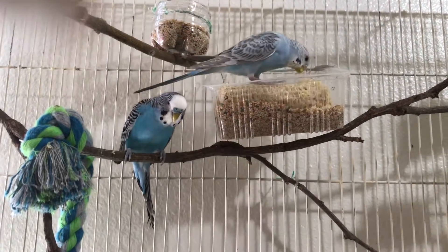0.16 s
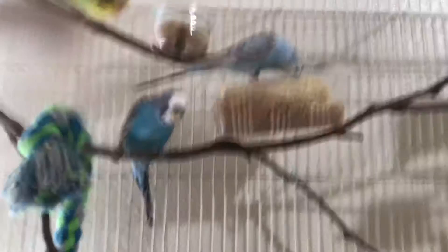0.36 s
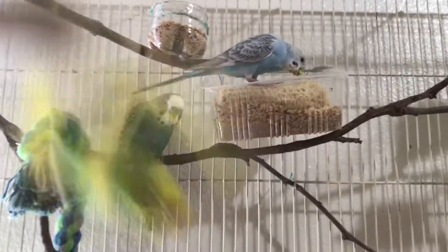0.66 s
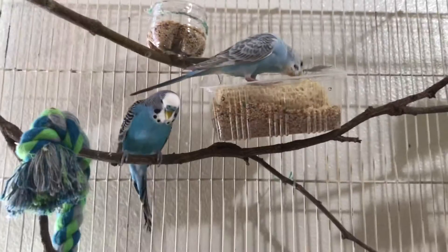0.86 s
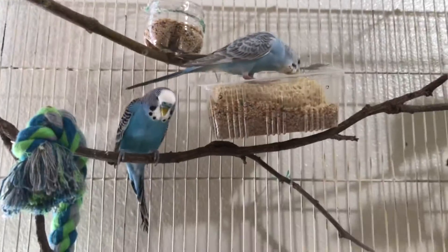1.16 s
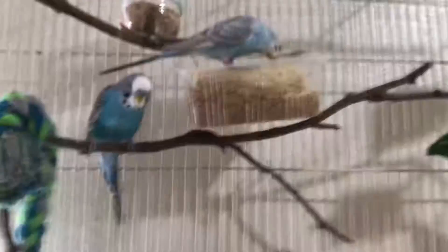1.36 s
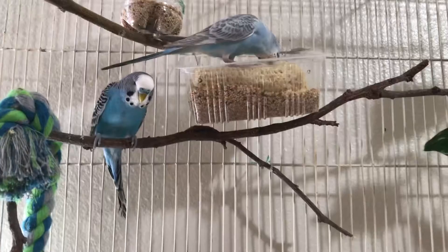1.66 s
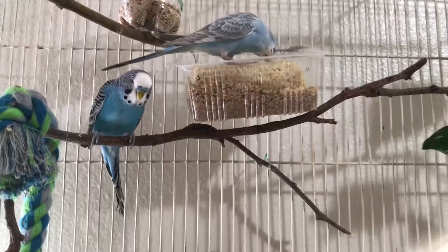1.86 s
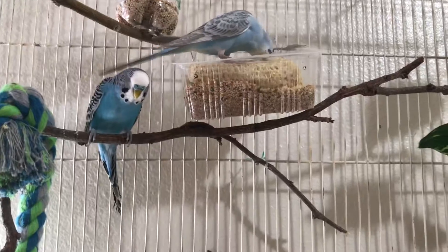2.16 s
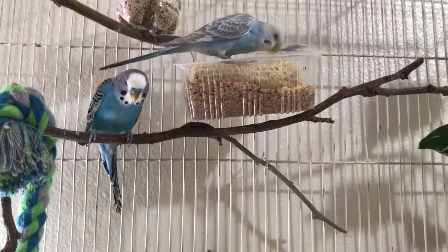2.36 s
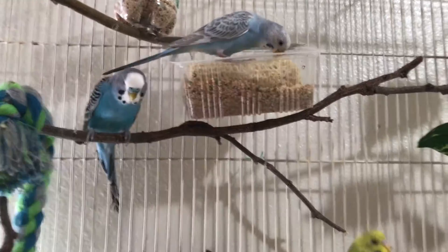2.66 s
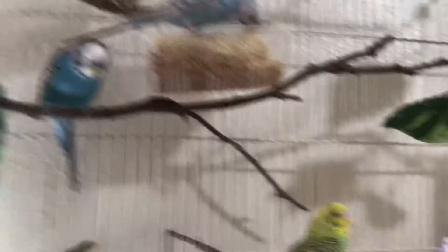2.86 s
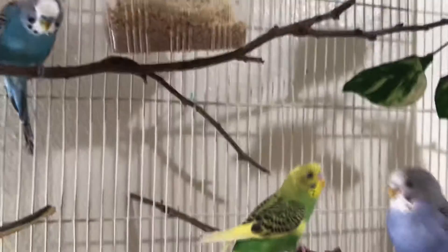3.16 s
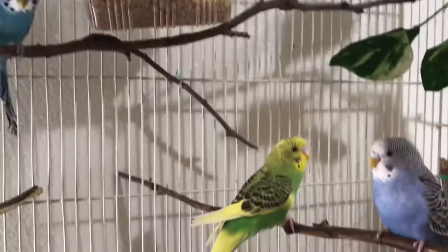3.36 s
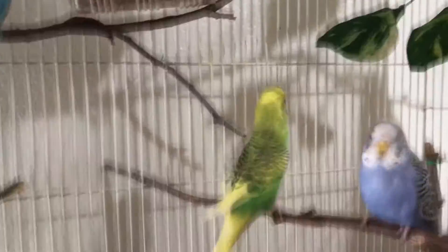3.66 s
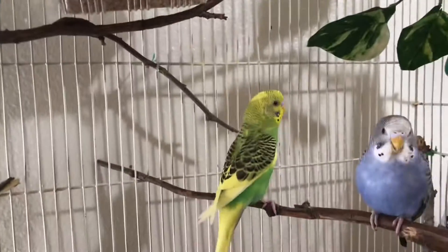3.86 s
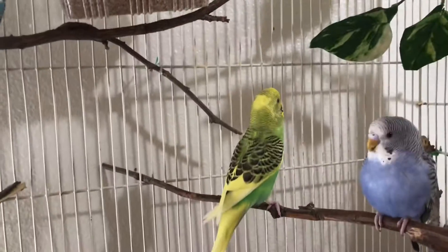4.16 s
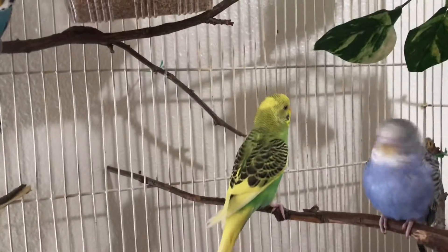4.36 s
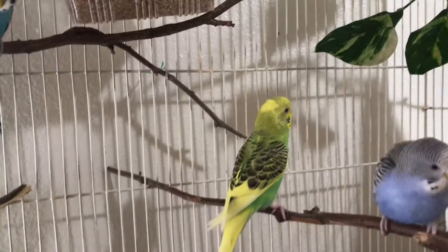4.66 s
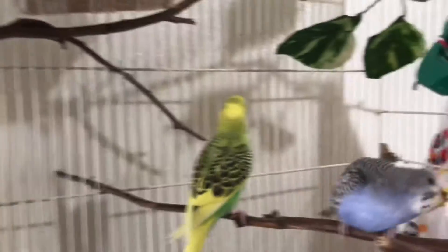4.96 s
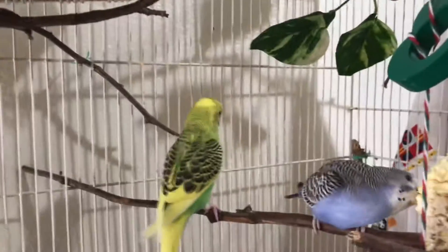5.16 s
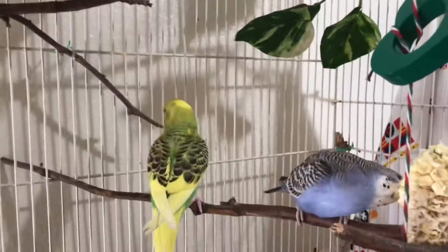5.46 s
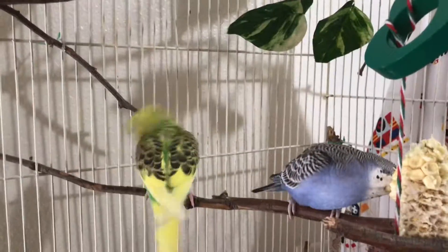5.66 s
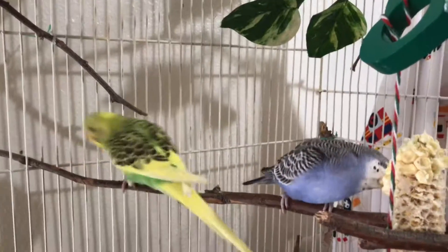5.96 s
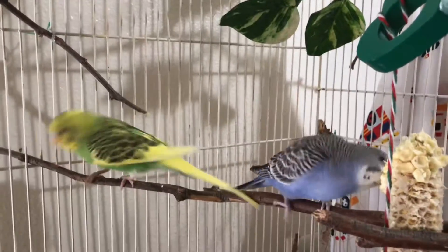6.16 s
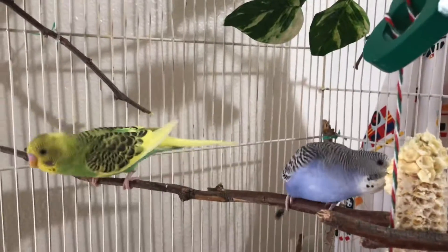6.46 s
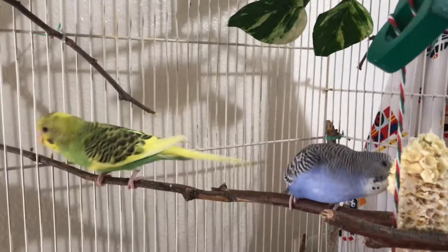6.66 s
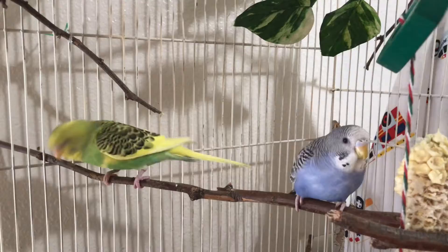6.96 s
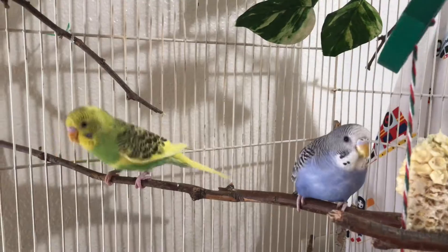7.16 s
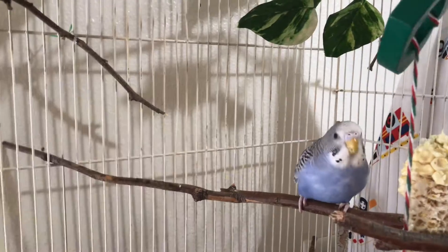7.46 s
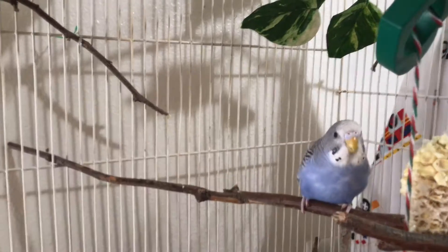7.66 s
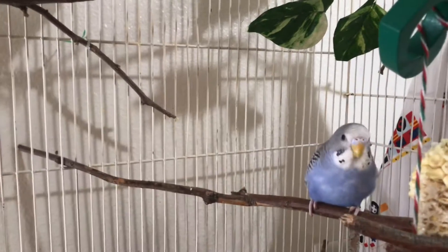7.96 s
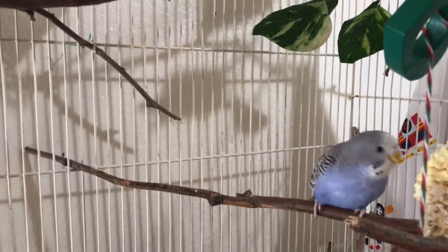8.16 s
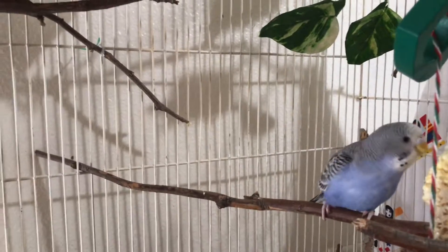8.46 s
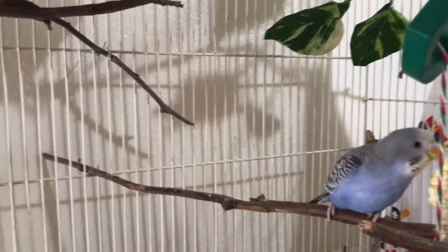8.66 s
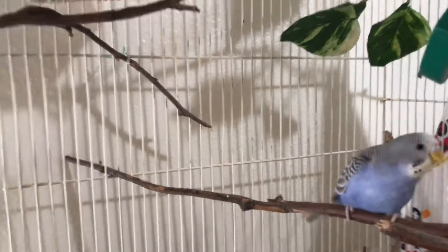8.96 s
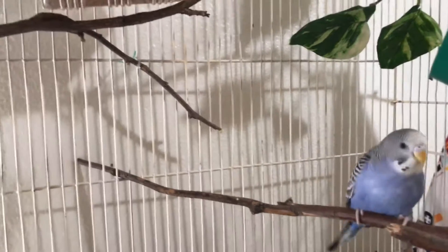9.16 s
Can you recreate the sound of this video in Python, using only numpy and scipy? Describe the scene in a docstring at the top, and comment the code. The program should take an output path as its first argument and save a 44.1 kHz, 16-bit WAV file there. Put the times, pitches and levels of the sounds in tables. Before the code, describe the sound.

Close indoor sound of small pet parrots: scratchy chirps, tumbling chatter and thin whistles over a very quiet low rumble. Feathers rustle faintly and dull knocks come from perches and bars. Birds flutter past early on, then calls become occasional with small clatters. Rasps later gather into a busy series, interrupted by a low burst of wing air, and near the end a bird flaps hard beside the microphone with bassy thuds and slaps.

```python
"""Budgerigars in a wire cage in a small room, over a quiet rumble made of shaped noise.
Feathers stir until 1.8 s; buzzing rasps (pulsed pitch sweeps) and runs of gliding whistles come and go.
Decaying noise makes knocks and feather ticks from 0.35 s on; sines make wires hum after some early knocks.
Birds fly past from about 0.7, 1.8, 7.4 and 8.7 s: each wingbeat puffs on the microphone, feathers crackle,
and near 2.0, 7.5 and 8.9 s a wing buffets it with bursts of eddies; wing slaps follow from 8.92 s."""
import sys
import numpy as np
from scipy import signal
from scipy.fft import rfft, irfft, next_fast_len
from scipy.io import wavfile

SR = 44100
rng = np.random.default_rng(int(sys.argv[2]) if len(sys.argv) > 2 else 0)


def dump_mix(stems):
    """Bounce the given channels to the path in sys.argv[1] as a 16-bit WAV at rate SR."""
    frames = np.atleast_2d(stems).T  # one column per channel
    limited = np.clip(frames, -1, 1)  # hard clip at full scale
    pcm = np.round(limited * 32767).astype(np.int16)
    wavfile.write(sys.argv[1], SR, pcm)


N = 411453
TIME = np.arange(N) / SR
# relative spectrum of the breath hiss in the calls: frequency_hz, density_db (per Hz)
BREATH_SPECTRUM = [(900, -35.5), (2000, -3), (5000, 12.5), (8500, 7), (10500, -10.5), (12500, -1),
                   (16000, -12.5)]


def from_db(db):
    """Logarithmic level: 20 dB is a tenfold amplitude."""
    return 10 ** (np.asarray(db) / 20)


def rms_one(x):
    """Normalisation: divide by the root mean square to reach unit power."""
    return x / np.sqrt(np.mean(x ** 2) + 1e-20)


def at_hz(points, hz):
    """Interpolation on a log-frequency axis, where equal steps are equal musical intervals."""
    frequency_hz, value = np.transpose(points)
    return np.interp(np.log(np.maximum(hz, 1)), np.log(frequency_hz), value)


def noise(spectrum, size):
    """Spectral shaping: white noise weighted in frequency, at unit power."""
    n = next_fast_len(size)
    hz = np.arange(n // 2 + 1) * SR / n
    low_cut = np.minimum(hz / 20, 1) ** 2
    shaped = rfft(rng.standard_normal(n)) * from_db(at_hz(spectrum, hz)) * low_cut
    return rms_one(irfft(shaped, n)[:size])


def wander(t, per_s):
    """Random modulation: straight lines between normal draws of spread 1, per_s of them a second."""
    knots = rng.standard_normal(8192)
    return np.interp((t - t[0]) * per_s, np.arange(len(knots)), knots)


def add(track, start_s, sound):
    """Superposition: sounds sum sample by sample."""
    i = max(int(start_s * SR), 0)
    track[i:i + len(sound)] += sound[:max(len(track) - i, 0)]


def fade(t, edge_s):
    """Raised-sine envelope: smooth edges avoid clicks."""
    from_edge = np.minimum(t - t[0], t[-1] - t)
    return np.sin(np.pi / 2 * np.clip(from_edge / edge_s, 0, 1)) ** 2


def room_rumble(level_db=-57):
    """Stationary background noise: a steady broadband sound weighted to the bass."""
    # relative spectrum of the room noise: frequency_hz, density_db (per Hz)
    rumble_spectrum = [(25, -22), (60, 1.5), (90, -4), (130, -1.5), (220, -12), (400, -15.5), (1000, -16.5),
                       (1700, -25.5), (2500, -22), (3600, -25.5), (6500, -35.5), (16000, -39.5)]
    return from_db(level_db) * noise(rumble_spectrum, N)


def room(x, wet_db=-19.0, build_s=0.0027):
    """Reverberation: direct sound, near reflections, then a diffuse tail whose treble dies first."""
    # room decay: frequency_hz, t60_s
    decay_times = [(200, .45), (1000, 0.46), (4000, 0.39), (7000, 0.27), (14000, 0.21)]
    # reflections from the wall and feeders near the cage: delay_s, level_db
    reflections = [(.0009, -27), (.0019, -27.5), (.0034, -20), (.0052, -46.5), (.0083, -14.5)]
    t = np.arange(int(.7 * SR)) / SR
    edges_hz = np.geomspace(150, 18000, 8)
    response = np.zeros(len(t))
    for low, high in zip(edges_hz, edges_hz[1:]):
        band_filter = signal.butter(2, [low, high], "band", fs=SR, output="sos")
        band = signal.sosfilt(band_filter, rng.standard_normal(len(t)))
        t60_s = at_hz(decay_times, np.sqrt(low * high))
        response += band * from_db(-60 * t / t60_s)
    response *= 1 - np.exp(-t / build_s)
    response *= from_db(wet_db) / np.sqrt(np.sum(response ** 2))
    response[0] = 1  # direct sound
    for delay_s, level_db in reflections:
        add(response, delay_s, from_db([level_db]))
    return signal.fftconvolve(x, response)[:N]


def bars():
    """Free vibration: a touched cage wire hums on as a decaying sine."""
    # wires left ringing: start_s, pitch_hz, level_db (peak), t60_s
    ringing_wires = [(.352, 415, -52, .95), (.352, 622, -55.5, 1.13), (1.595, 679, -52, 1.2),
                     (1.594, 1250, -59, 1.06), (2.747, 855, -55, .41)]
    out, t = np.zeros(N), np.arange(SR) / SR
    for start_s, pitch_hz, level_db, t60_s in ringing_wires:
        add(out, start_s, from_db(level_db - 60 * t / t60_s) * np.sin(2 * np.pi * pitch_hz * t))
    return out


def knocks_and_slaps(tick_t60_s=0.023, skirt_db=-20.5):
    """Impulsive excitation: a bright tick with a duller, band-centred body, both as decaying noise."""
    # knocks on perches, bars and furnishings, feather ticks, and wing slaps from 8.92 s:
    # start_s, level_db, centre_hz, t60_s, tick_db
    impacts = [(.352, -26.5, 560, 0.074, -57), (0.375, -45, 585, 0.99, -64), (.395, -36, 825, 0.049, -49),
               (.856, -27, 1030, 0.049, -30), (1.344, -22.5, 1000, 0.028, -49.5),
               (1.359, -28.5, 890, .015, -25), (1.594, -53.5, 707, 0.86, -74), (1.774, -55, 910, .062, -36),
               (2.746, -33, 616, 0.0163, -55), (2.789, -48, 670, 0.38, -69.5),
               (2.862, -61.5, 920, .067, -36), (3.34, -50.5, 1500, 0.11, -51),
               (3.355, -43, 1500, 0.17, -50.5), (3.665, -46, 1213, 0.26, -49.5),
               (4.399, -39, 790, 0.091, -51.5), (4.541, -28, 497, 0.076, -35),
               (4.575, -33.5, 1080, .57, -29), (4.622, -39.5, 1100, 0.29, -37),
               (5.014, -42, 1080, 0.62, -37), (5.59, -50.5, 1010, 0.2, -77),
               (8.922, -21.5, 1160, 0.021, -25.5), (8.942, -9, 1110, 0.0082, -13),
               (8.997, -25, 1200, 0.056, -24), (9.188, -44, 890, 0.028, -19.5)]
    # relative spectrum of the bright tick: frequency_hz, density_db (per Hz)
    tick_spectrum = [(600, -8), (2000, 3.5), (5500, 3.5), (9000, -5), (16000, -5.5)]
    out, t = np.zeros(N), np.arange(SR // 2) / SR
    for start_s, level_db, hz, t60_s, tick_db in impacts:
        modes = [(hz / 8, -12), (hz / 2, -8), (hz, 0), (hz * 1.36, -10), (hz * 4, skirt_db), (hz * 12, -50)]
        body = noise(modes, len(t)) * from_db(level_db - 60 * t / t60_s)
        tick = noise(tick_spectrum, len(t)) * from_db(tick_db - 60 * t / tick_t60_s)
        add(out, start_s, body + tick)
    return out


def buffets():
    """Turbulent pressure: a wing sweeping right past the microphone gives a short, strong burst of eddies."""
    # bursts: centre_s, level_db, length_s (time scale of the envelope)
    bursts = [(1.992, -28, .007), (7.509, -8, 0.0062), (7.536, -14, 0.012), (8.906, -9.5, 0.0062),
              (8.943, -14, 0.0035)]
    # relative spectrum of the eddies: frequency_hz, density_db (per Hz)
    eddy_spectrum = [(30, -10), (85, 7.5), (160, 5.5), (300, -4), (500, -5.5), (900, -22.5), (1600, -38),
                     (4000, -60.5)]
    out, t = np.zeros(N), np.arange(-.08, .08, 1 / SR)
    for centre_s, level_db, length_s in bursts:
        burst = noise(eddy_spectrum, len(t)) / np.cosh(t / length_s)
        add(out, centre_s + t[0], from_db(level_db) * burst)
    return out


def wingbeat_times(first, last, period_s, lengthening_s):
    """Near-periodic motion: each stroke is a fixed amount longer or shorter than the one before."""
    k = np.arange(20)
    times = first + period_s * k + lengthening_s * k ** 2 / 2
    return times[times < last + period_s / 2]


def nearness_db(t, nearest, approach_s, departure_s):
    """Inverse-distance law: the level of a passing bird, 0 dB at its nearest."""
    time_scale_s = np.where(t < nearest, approach_s, departure_s)
    return -20 * np.log10(np.hypot(1, (t - nearest) / time_scale_s))


def wing_puff(level_db, settle_hz=54, push_hz=65, peak_s=0.0174, puff_db=5.0,
              gust_db=7.5, gust_growth=1.295, gust_s=0.0096 / 1.72):
    """Near-field pressure: a downstroke's wave slows as it dies, with turbulence that grows faster than it."""
    # relative spectrum of the gust: frequency_hz, density_db (per Hz)
    gust_spectrum = [(30, 0.5), (100, 13), (200, 1.5), (350, -9.5), (600, -4), (900, -16.5), (1600, -38),
                     (4000, -57.5)]
    t = np.arange(int(.1 * SR)) / SR
    hz = (settle_hz + push_hz * np.exp(-t / .011)) * np.exp(.19 * rng.standard_normal())
    swell = (t / peak_s * np.exp(1 - t / peak_s)) ** 2
    wave = np.sin(2 * np.pi * np.cumsum(hz) / SR) * swell * fade(t, 0.0009)
    gust = noise(gust_spectrum, len(t)) / np.cosh((t - .035) / gust_s)
    return from_db(level_db + puff_db) * wave, from_db(gust_growth * level_db + gust_db) * gust


def flights(uneven_db=3.5, crackle_db=5.0, snap_db=1.5, edge_s=0.099, feeding_db=-60.5, feeding_end_s=1.8):
    """Distance laws: puff waves fall with distance squared, crackling feather noise with distance."""
    # passes: first_beat_s, last_beat_s, beat_period_s, lengthening_s (per beat), nearest_s, approach_s,
    # departure_s, puff_db (nearest, before unevenness and the puff's own gains),
    # rustle_db (nearest, before the snaps of the crackle)
    passes = [(.686, 1.49, .0485, .0006, .85, .13, .8, -30, -43),
              (1.79, 2.42, .049, .00066, 2.0, .11, .6, -31.5, -47),
              (7.355, 7.62, .0465, -.001, 7.505, .08, .06, -21.5, -47),
              (8.718, 9.31, .0565, .00024, 8.885, .07, .17, -14.5, -41.5)]
    # relative spectrum of feather noise: frequency_hz, density_db (per Hz)
    feather_spectrum = [(300, 5), (900, 1.5), (3000, -4), (6500, -6), (10000, -12), (16000, -10.5)]
    puffs = np.zeros(N)
    rustle = from_db(feeding_db) * (TIME < feeding_end_s)  # a bird stirs faintly at the seed tray
    for first, last, period_s, lengthening_s, *passing, puff_db, rustle_db in passes:
        for beat_s in wingbeat_times(first, last, period_s, lengthening_s):
            level_db = puff_db + 2 * nearness_db(beat_s, *passing) + uneven_db * rng.standard_normal()
            wave, gust = wing_puff(level_db)
            add(puffs, beat_s - .005, wave)
            add(puffs, beat_s - .028, gust)
        t = np.arange(first - edge_s, last + edge_s, 1 / SR)
        add(rustle, t[0], from_db(rustle_db + nearness_db(t, *passing)) * fade(t, edge_s))
    grain = np.minimum(wander(TIME, 500), 2.5)
    crackle = rms_one(from_db(crackle_db * grain + snap_db * np.maximum(grain, 0) ** 2))
    return puffs, rustle * crackle * noise(feather_spectrum, N)


def off_the_wall(x, echo_db=-2.0):
    """Comb filtering: as the bird turns its head, each call meets a wall reflection at its own random delay."""
    lag = int(rng.uniform(.0003, .002) * SR)
    reflection = from_db(echo_db) * np.pad(x, (lag, 0))[:len(x)]
    return (x + reflection) / np.hypot(1, from_db(echo_db))


def note(start, end, first_hz, middle_hz, last_hz, level_db, octave_db, rough,
         trill_hz=200, fall_db=-18.0, air_db=-2.5):
    """Frequency modulation: a whistle glides along a parabola; when rough, it trills, throbs and hisses."""
    t = np.arange(start, end, 1 / SR)
    u = np.linspace(-1, 1, len(t))
    bow_hz = (last_hz + first_hz) / 2 - middle_hz
    glide = middle_hz + (last_hz - first_hz) / 2 * u + bow_hz * u ** 2
    trill = np.sin(2 * np.pi * np.cumsum(trill_hz * (1 + 0.164 * wander(t, 169))) / SR)
    roughness = rough * (.24 * trill + .16 * wander(t, 700))
    pitch = glide * np.exp(.028 * wander(t, 260) + roughness)
    phase = 2 * np.pi * np.cumsum(pitch) / SR
    tone = np.sin(phase)
    for k in range(2):  # second and third harmonics
        tone = tone + from_db(octave_db + k * fall_db) * np.sin((k + 2) * phase)
    air = rough * from_db(octave_db + air_db) * noise(BREATH_SPECTRUM, len(t))
    throb = (1 + rough * trill) * from_db(2.5 * wander(t, 180))
    swell = fade(t, .003) * (1 - .45 * u ** 2) * throb
    return off_the_wall(from_db(level_db) * np.sqrt(2) * rms_one(swell) * (tone + air))


def warble(start, end, level_db, centre_hz, rough, note_s=.032, step_s=.022, spread=.28, bend=0.2,
           octave_db=-16.0):
    """Granular texture: tiny overlapping notes at random pitches around a centre."""
    out = np.zeros(int((end - start + .1) * SR))
    for note_start_s in np.arange(0, end - start - step_s / 2, step_s):
        contour_hz = centre_hz * np.exp(spread * rng.uniform(-1, 1) + bend * rng.standard_normal(3))
        add(out, note_start_s, note(0, note_s, *contour_hz, level_db, octave_db, rough))
    return out


def syrinx(t, reference_hz, pulse_hz=180, arch_depth=.74, tense_hz=6250, pulse_db=2.5, crest=.74,
           slow_start=0.1326, settle_s=.035):
    """Pulsed valve: the syrinx opens in quickening pulses, each arching the pitch; gives pitch and opening."""
    starting = np.exp(-(t - t[0]) / settle_s)  # the first pulses are slower and stand apart
    rate_hz = pulse_hz * (1 - slow_start * starting + .11 * wander(t, 110))
    cycle = np.cumsum(rate_hz) / SR
    arch = np.sin(np.pi * (cycle % 1))
    tense = np.clip((2 * reference_hz - tense_hz) / 500, 0, 1)  # high calls hold their pitch and shut less
    opening = rms_one(.07 + .45 * tense + arch ** (1.5 + 1.8 * starting))
    opening = opening * from_db(pulse_db * np.clip(wander(t, pulse_hz), -2, 2))
    chaos = .12 * wander(t, 260) + .065 * wander(t, 1800)
    bend = (1 - 0.52 * tense) * (arch_depth * (arch - crest) + chaos)
    return reference_hz * np.exp(bend), opening


def rasp(start, end, attack_s, release_s, level_db, centre_hz, glide_hz, octave_db, upper_db, growl_db,
         beak_width_hz=2900, overtone_db=-13.0, overtone_fall_db=-14.5, half_pitch_db=-9.0):
    """Source and filter: pulsed sweeps with overtones, half-pitch and hiss; beak resonance favours the octave."""
    onset_db, end_db = -12.5, -10.5  # effort at the edges, relative to full
    attack_curve = 1.3  # power: the first pulses stay weak before the voice catches
    brightening = 0.2035  # overtones grow with effort, dB per dB
    climb_hz_per_s, late_crest = 6000.0, 1.25  # longer calls climb and fall back further; power delays the crest
    pitch_drift, colour_drift_db, drifts_per_s = .04, 5, 90.0  # random drift of log pitch and overtone strength
    t = np.arange(start, end, 1 / SR)
    progress = np.linspace(0, 1, len(t))
    attack_db = onset_db * np.maximum(1 - ((t - start) / attack_s) ** attack_curve, 0)
    release_db = end_db * np.maximum(1 - (end - t) / release_s, 0)
    effort_db = attack_db + release_db
    climb = np.sin(np.pi * progress ** late_crest)
    beak_hz = centre_hz + glide_hz * (progress - .5) + climb_hz_per_s * (end - start) * (climb - .7)
    pitch, opening = syrinx(t, beak_hz / 2 * np.exp(pitch_drift * wander(t, drifts_per_s)))
    phase = 2 * np.pi * np.cumsum(pitch) / SR
    beak = 1 / np.hypot(1, 2 * (2 * pitch - beak_hz) / beak_width_hz)
    bright_db = brightening * effort_db
    high_db = upper_db + bright_db
    overtones = [(np.sin(phase / 2), growl_db + half_pitch_db),
                 (np.sin(2 * phase) * beak, octave_db + bright_db),
                 (np.sin(3 * phase), high_db + overtone_db),
                 (np.sin(4 * phase), high_db + overtone_db + overtone_fall_db),
                 (noise(BREATH_SPECTRUM, len(t)), high_db - 3)]
    voice = rms_one(opening * np.sin(phase))
    for wave, db in overtones:
        colour = from_db(colour_drift_db * np.tanh(wander(t, drifts_per_s)))
        voice = voice + from_db(db) * rms_one(opening * wave * colour)
    return off_the_wall(from_db(level_db + effort_db) * voice * fade(t, .003))


def birds(rasp_gain_db=0.25, whistle_gain_db=1.0):
    """Superposition of voices: rasps, standing-out whistles and soft warbling add linearly."""
    # rasps: start_s, end_s, attack_s, release_s, level_db (fundamental, before the rasp gain), centre_hz (beak
    # resonance before the climb), glide_hz (over the call), then octave_db, upper_db and growl_db
    # (relative to the fundamental, before brightening and the offsets in rasp)
    rasp_calls = [(0.043, 0.124, 0.0049, 0.0054, -26.5, 6170, 424, 0.5, 2, 2.5),
                  (0.244, 0.303, 0.018, 0.044, -29.5, 5830, -22, 0.5, -1.5, 6.5),
                  (1.016, 1.064, 0.0077, 0.047, -23.5, 5770, -620.0, 1.5, -7.0, -5),
                  (1.843, 1.882, 0.011, 0.017, -20.5, 5980, -70.5, 3.5, -1.5, -7.5),
                  (1.975, 2.051, 0.025, 0.023, -24.0, 5820.0, -400.0, 5, 1, -7.5),
                  (2.123, 2.185, 0.006, 0.0091, -29, 5820, -200.0, 8, 8.5, -5),
                  (2.262, 2.41, 0.022, 0.022, -24.5, 6430, 389, 8.0, 4, -17.5),
                  (2.883, 2.985, 0.018, 0.024, -24.5, 5950, 145, 7.5, -0.5, -15.5),
                  (5.66, 5.719, 0.014, 0.037, -27, 6250, -450.0, 9.5, 6, -9),
                  (5.831, 5.894, 0.017, 0.026, -29, 6100, 574, 5, 3.5, -15.5),
                  (5.895, 5.977, 0.025, 0.04, -26, 6390, 658, 5, 3, -32),
                  (6.064, 6.238, 0.017, 0.14, -24.0, 6356, 122.5, 9, 6, -13.0),
                  (6.645, 6.699, 0.0054, 0.026, -27, 5990, 92, 4.5, -3.5, -36),
                  (6.8, 6.891, 0.025, 0.031, -25.5, 5820, -400.0, 7.5, 4.5, -20),
                  (6.978, 7.051, 0.017, 0.0084, -28, 5930, 60.5, 12, 7.5, -8),
                  (7.162, 7.271, 0.053, 0.078, -21, 5515, -80.0, 10.5, 6.5, -7.5),
                  (7.324, 7.405, 0.079, 0.037, -17, 5810, -600.0, 6.5, 0, -7.5),
                  (7.482, 7.555, 0.0043, 0.006, -28, 5410, -1010.0, 2, -9.5, -13),
                  (7.675, 7.766, 0.0034, 0.013, -40.5, 4380, -60, 16.5, 9, -11),
                  (7.889, 7.963, 0.017, 0.038, -34.5, 4340, -680.0, 9.5, -6, -17),
                  (8.077, 8.148, 0.018, 0.0051, -27.5, 5610, -540.0, 8.5, -1, -18),
                  (8.327, 8.403, 0.022, 0.022, -22, 5840, -670.0, 5.5, -3.5, -12),
                  (8.719, 8.789, 0.016, 0.0099, -25, 5885, -84, 5.5, 8, -14),
                  (9.075, 9.145, 0.006, 0.0067, -24, 5950.0, -300.0, 4, 3, -5.5)]
    # whistles: start_s, end_s, first_hz, middle_hz, last_hz, level_db (before the whistle gain),
    # octave_db (relative to the fundamental), roughness (0-1)
    whistles = [(0.678, 0.691, 4500, 4240, 3780, -43.5, -11, 0.18),
                (0.713, 0.722, 3960, 3140, 3320, -31, -19, 0.14),
                (0.752, 0.786, 2840, 2370, 2150, -36, -19, 0.2),
                (0.78, 0.792, 4130, 3430, 2980, -19.5, -17, 0.77),
                (0.787, 0.813, 3230, 3030, 3570, -28.5, 0, 0.18),
                (0.887, 0.917, 3270, 3770, 2600, -21, -7.5, 0.07),
                (0.908, 0.954, 3020, 3280, 2770, -33.5, 1.5, 0.63),
                (0.945, 1.004, 1660, 1625, 1660, -40.5, -23, 0.15),
                (1.105, 1.126, 2350, 2640, 1400, -26.5, 3.5, 0.3),
                (1.186, 1.223, 2850, 3095, 2060, -33.5, -35, 0.16),
                (1.223, 1.249, 1670, 1720, 1250, -39, -18, 0.2),
                (1.263, 1.302, 1570, 1936, 1810, -35.5, -32, 0),
                (1.296, 1.343, 1580, 1363, 1385, -38.5, -22, 0.15),
                (1.407, 1.424, 2720, 2350, 1480, -37, -13, 0),
                (1.42, 1.451, 3300, 3480, 3740, -27, -25, 0.21),
                (1.441, 1.448, 3760, 2630, 1680, -30, -8, .44),
                (1.448, 1.468, 2750, 2890, 2720, -31.5, -30, .05),
                (1.472, 1.501, 3170, 3050, 1850, -31.5, -21, 0.02),
                (1.504, 1.525, 3420, 3520, 3540, -27.5, -36, 0.15),
                (2.483, 2.507, 2800, 3100, 2400, -39.5, 0.5, 0.06),
                (2.508, 2.535, 2050, 2460, 2260, -36, -32, 0.15),
                (2.53, 2.551, 2040, 1420, 1290, -47.5, -8, .37),
                (2.552, 2.579, 2830, 2630, 1740, -34, -17, 0.08),
                (2.568, 2.578, 4700, 4070, 3800, -33, -11.5, 0.06),
                (2.579, 2.588, 4290, 3660, 2900, -23, -19, 0.35),
                (2.586, 2.609, 3177, 3060, 2820, -32, 9.5, 0.24),
                (2.61, 2.63, 1770, 1980, 2800, -36, -3.5, 0.4),
                (2.647, 2.672, 2520, 2740, 1860, -37, -5.5, .2),
                (2.67, 2.702, 4400, 3090, 2770, -29.5, -12, 0.4),
                (2.699, 2.73, 2200, 2220, 1290, -42, -10, .3),
                (2.735, 2.759, 2670, 2530, 2220, -34, -4.5, 0.04),
                (2.758, 2.786, 3200, 2907, 2650, -29, -4.5, 0.18),
                (3.397, 3.449, 1944, 1275, 1096, -50, -13.5, 0.53),
                (3.458, 3.5, 1090, 1310, 1510, -52.5, -8, 0),
                (3.498, 3.595, 980, 1090, 1190, -51.5, -17.5, 0),
                (3.943, 3.979, 3070, 2800, 2330, -35.5, -26, 0.13),
                (3.978, 4.008, 2240, 1485, 1580, -42, -10.5, 0.42),
                (4.002, 4.031, 2680, 2515, 2630, -36, -19, 0.24),
                (4.032, 4.061, 3480, 3760, 3960, -23, -20.5, .33),
                (4.401, 4.428, 3590, 2904, 2220, -47, -35, .2),
                (4.413, 4.445, 2450, 3290, 2710, -47.5, -37, .03),
                (4.47, 4.509, 1160, 1610, 1900, -51.5, -16, 0.25),
                (4.507, 4.535, 2690, 2190, 1590, -46.5, -12.5, 0.17),
                (4.53, 4.551, 3680, 3138, 3730, -25.5, -35, 0.17),
                (5.279, 5.301, 3750, 3304, 2510, -21.5, -22, 0.22),
                (5.304, 5.32, 3300, 2654, 1610, -29.5, -2, 0.33),
                (5.316, 5.33, 4120, 3480, 3470, -22.5, -24, .44),
                (5.323, 5.352, 2157, 1803, 2270, -28.5, -13, 0.62),
                (5.355, 5.381, 3550, 2846, 3020, -27, -6.5, 0.48),
                (5.37, 5.401, 3830, 3830, 3530, -21, -18.5, 0.38),
                (7.405, 7.425, 2840, 3360, 3420, -25, -4, .46),
                (7.631, 7.686, 3870, 4130, 3720, -26.5, -16.5, 0.14),
                (7.68, 7.775, 3700, 3745, 3550, -24, -15, 0.44),
                (7.857, 7.89, 3140, 2826, 2950, -31.5, -13, 0.2),
                (7.886, 7.953, 2860, 2827, 3420, -27.5, -16.5, 0.87),
                (8.029, 8.062, 3420, 3620, 4200, -34, -15.5, 0.42),
                (8.06, 8.106, 3320, 3390, 3510, -26.5, -15, 0.8)]
    # warbling between and beneath the louder calls: start_s, end_s, level_db (each note), centre_hz,
    # roughness (0-1)
    warble_runs = [(0.68, .8, -42.5, 2630, 0.19), (0.883, .96, -34.5, 2073, 0.59),
                   (1.169, 1.5, -45, 1850, 0.13), (2.507, 2.78, -44.5, 1950, 0.29),
                   (3.202, 3.36, -69.5, 1700, 0.36), (3.386, 3.7, -55.5, 1593, .4),
                   (4.407, 4.51, -54, 1980, .45), (5.29, 5.4, -33.5, 2288, 0.63),
                   (6.332, 6.62, -65, 1607, 0.77), (7.634, 7.76, -38.5, 2442, 0.42)]
    out = np.zeros(N)
    for row in rasp_calls:
        add(out, row[0], from_db(rasp_gain_db) * rasp(*row))
    for row in whistles:
        add(out, row[0], from_db(whistle_gain_db) * note(*row))
    for row in warble_runs:
        add(out, row[0], warble(*row))
    return out


def scene():
    """Sound paths: birds and cage excite the room; puffs and buffets act on the microphone itself."""
    rumble = room_rumble()
    puffs, feathers = flights()
    in_room = room(birds() + knocks_and_slaps() + bars() + feathers)
    return (in_room + puffs + buffets() + rumble)[None]


def record(dry):
    """Saturation and band limiting: the highest peaks are rounded and the top is cut."""
    cutoff_hz = 15900
    rounded = dry / (1 + dry ** 4) ** .25
    low_pass = signal.ellip(10, .1, 80, cutoff_hz, fs=SR, output="sos")
    return signal.sosfilt(low_pass, rounded)


dry = scene()
out = record(dry)
dump_mix(out)
```